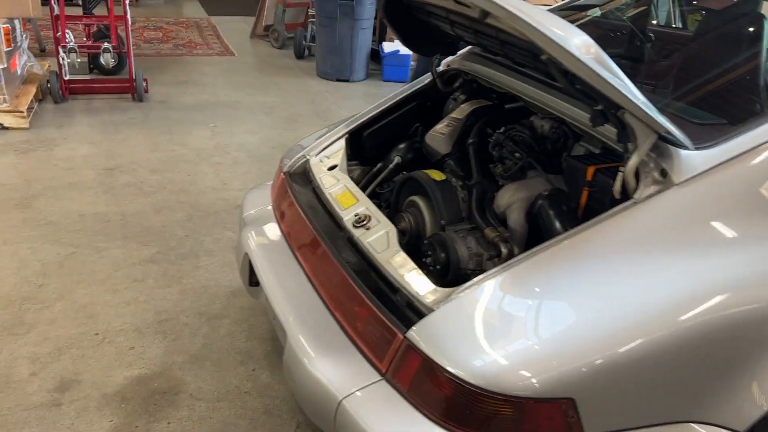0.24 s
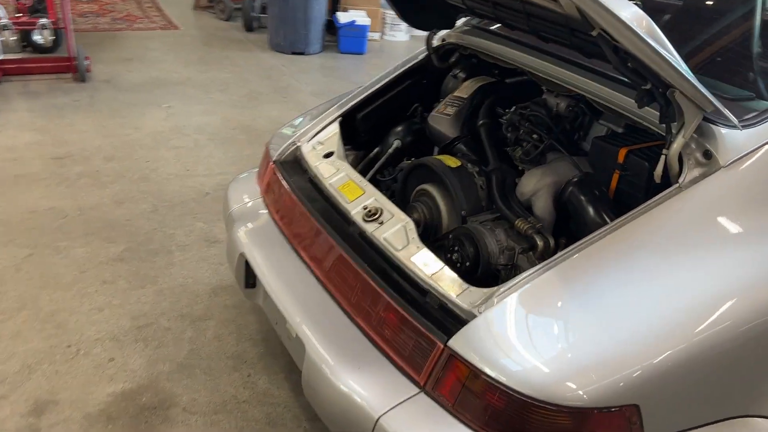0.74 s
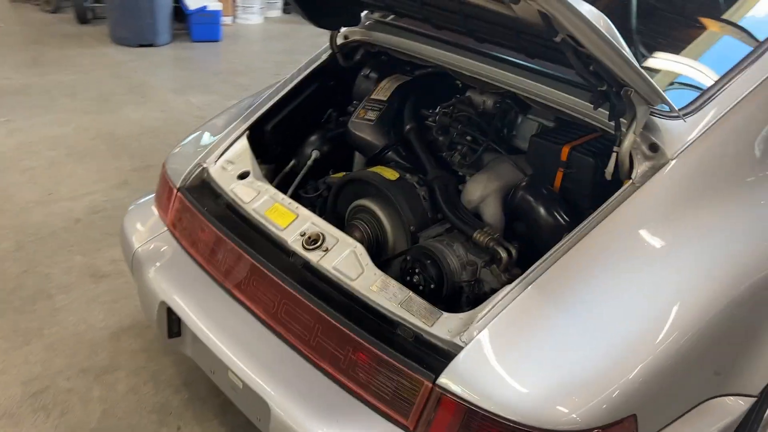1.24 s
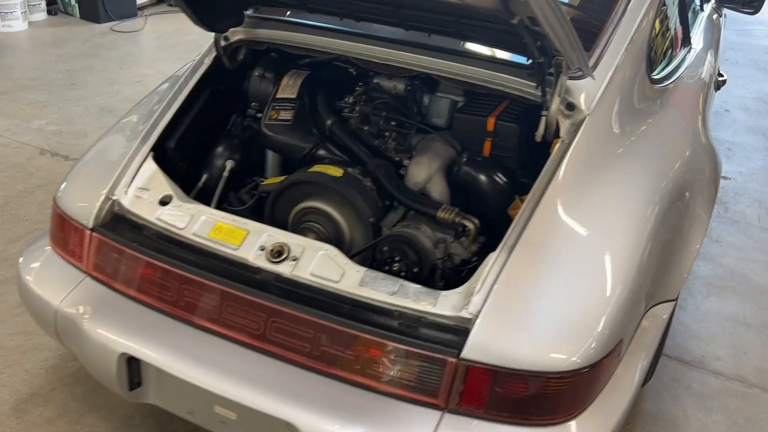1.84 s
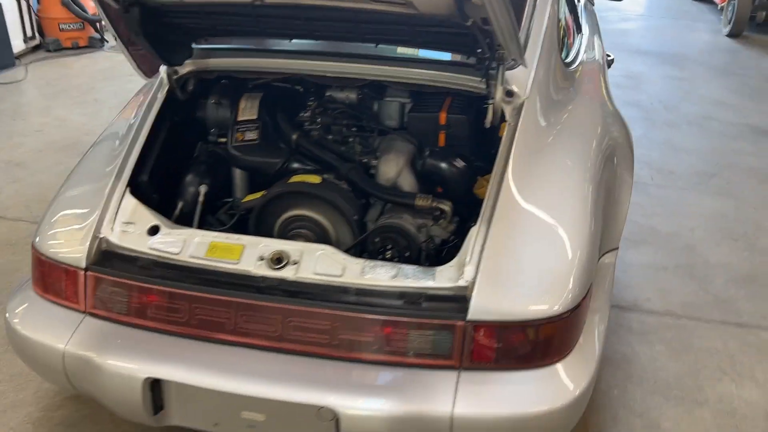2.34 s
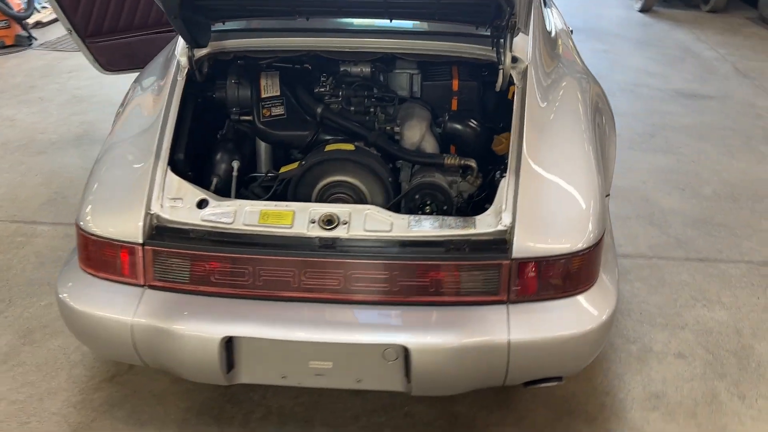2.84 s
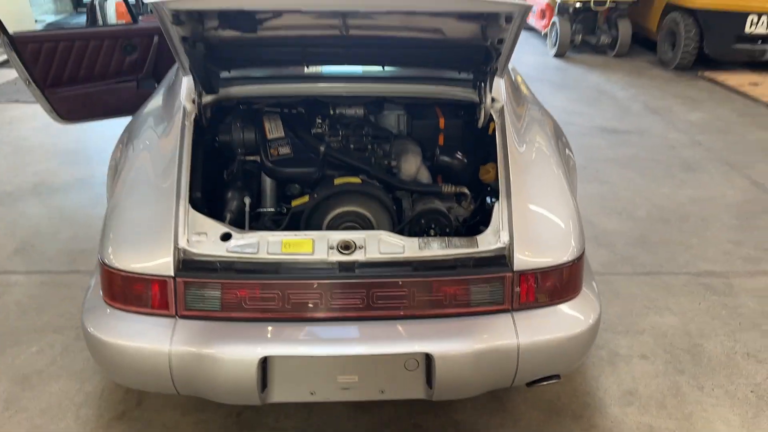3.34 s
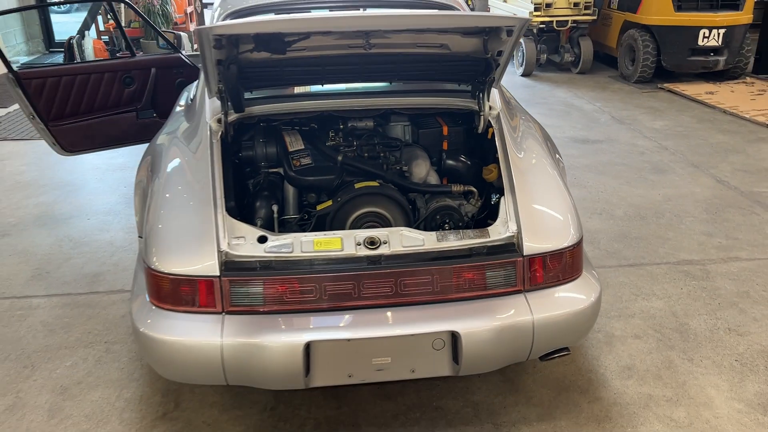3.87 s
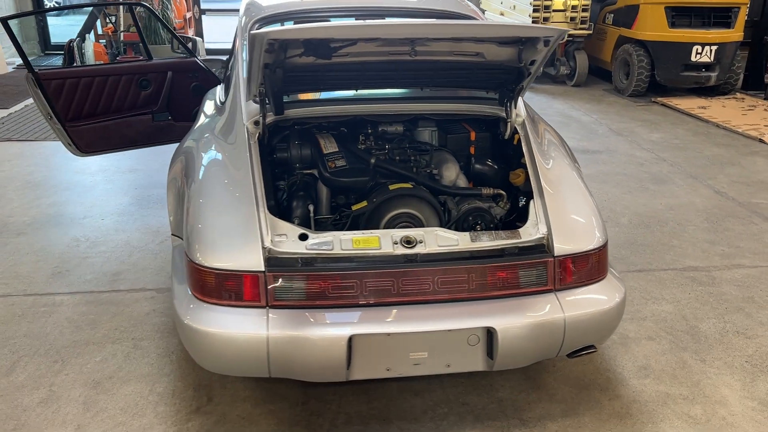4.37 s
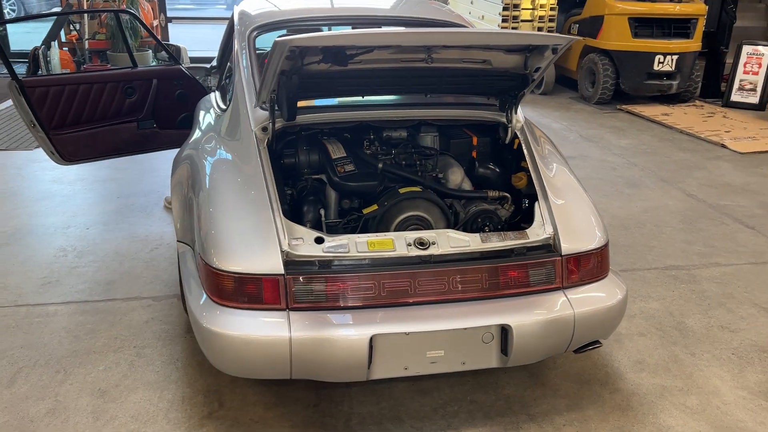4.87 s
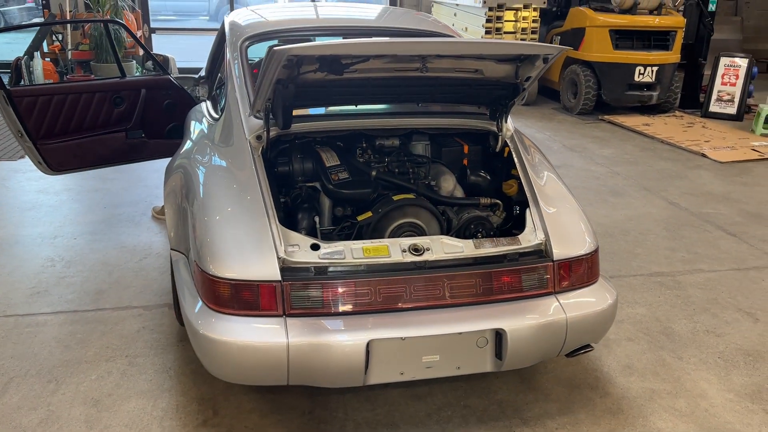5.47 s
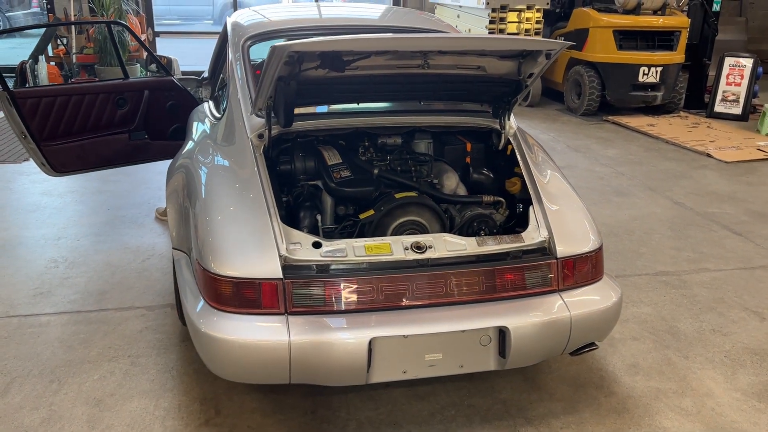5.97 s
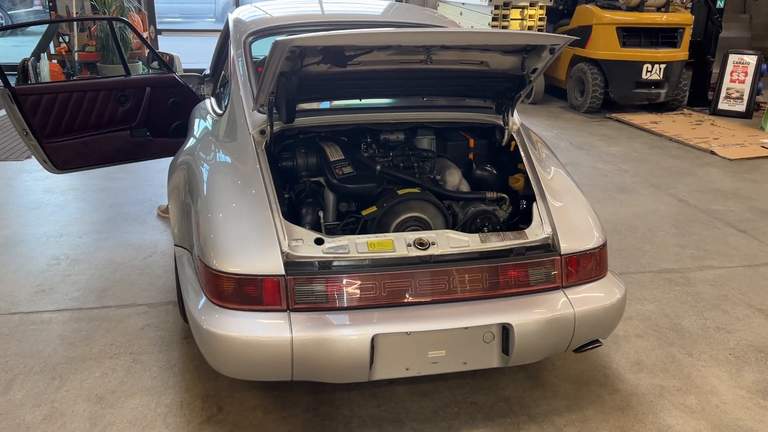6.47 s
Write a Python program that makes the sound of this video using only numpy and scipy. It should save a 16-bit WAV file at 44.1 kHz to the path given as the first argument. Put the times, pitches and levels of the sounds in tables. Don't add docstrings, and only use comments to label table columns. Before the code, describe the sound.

A six-cylinder air-cooled car engine is already idling in a large workshop. Low, slightly uneven exhaust throbs sit under a rushing cooling fan, soft valve ticking and an intake whistle dipping and rising several times a second. Thin belt squeals flare, strongest midway. A handheld stereo microphone moves around the open tail at a few metres, and the idle stumbles more towards the end.

```python
import sys
import numpy as np
from scipy import signal
from scipy.fft import rfft, irfft
from scipy.io import wavfile
from scipy.ndimage import uniform_filter1d

SR = 44100
rng = np.random.default_rng(int(sys.argv[2]) if len(sys.argv) > 2 else 0)


def gain_from_db(level_db):
    decades = np.asarray(level_db, float) / 20
    return 10 ** decades


def unload_wav(signal):
    wavfile.write(
        sys.argv[1],
        SR,
        np.round(np.clip(np.atleast_2d(signal).T, -1, 1) * 32767).astype(np.int16),
    )


N = 295894

# time_s, cycle_rate_hz
IDLE_SPEED = [(0, 8.078), (0.5, 7.81), (1.35, 7.934), (1.7, 7.741), (2.4, 7.682), (2.9, 7.836),
              (3.4, 7.709), (3.7, 7.902), (4.5, 7.76), (5.3, 7.847), (6.71, 7.71)]
# time_s, dip_db
STUMBLES = [(0.07, -1.8), (0.444, -2.2), (0.701, -3.6), (0.927, -2.1), (1.599, -2.6), (1.853, -4.5),
            (2.109, -1.9), (2.349, -2.4), (2.497, -5.5), (2.753, -5.3), (3.272, -11.9), (3.426, -1.6),
            (3.778, -2.5), (4.036, -3.5), (4.299, -9.0), (4.551, -6.3), (4.757, -5.2), (4.932, -9.3),
            (5.32, -16.5), (5.562, -10.2), (5.83, -11.4), (6.088, -18.3), (6.329, -2.2), (6.474, -2.5),
            (6.594, -1.9)]
# strength_db, lateness_ms, valve_tick_db, short_pipe_rasp_db
CYLINDERS = [(0, .1, -3, -13), (.5, .5, -2, -9), (-2, 1.2, -4, 0), (-1, .9, -5, -3), (1, -.6, 3, -13),
             (0, .1, -3, -13)]
# pitch_hz, width_hz, far_bank_share, rasp_share
PIPE_MODES = [(47, 14, .9, 0), (70, 12, -.4, 0), (98, 10, -.1, .25), (117, 7, -.5, 0)]
# pitch_hz, width_hz, far_bank_share, rasp_share
SILENCER_MODES = [(140, 6, .8, 0), (166, 15, .9, 1), (194, 18, .5, .3), (238, 15, .5, .2),
                  (260, 14, -.3, .3), (297, 25, .3, .2)]
PIPE_TRIM_DB = [0.6, -0.6, -0.5, -5]
SILENCER_DB = [-33.5, -31, -39, -33, -44.5, -50.5]
# time_s, distance_m, bearing_from_tail_deg
WALK = [(0, 2.6, 62), (.7, 2.15, 46), (1.3, 2.55, 36), (2.3, 3.15, 15.5), (3, 3.24, 14.5), (3.8, 3.14, 4),
        (4.3, 3.4, -20), (4.7, 4.3, -19), (5.4, 3.36, -26), (6.71, 4.2, -28)]
# level_at_2m_db, distance_loss_share, lobe_db, aim_deg, half_width_deg
PIPE_BEAMS = [(-12, 1, 1, 20, 15), (-17.5, 0.53, 2.5, 21, 12.5), (-23.5, .05, 5.5, 19.6, 8.1),
              (-25.5, -0.4, 4.5, 22.6, 9.2)]
FAN_BEAMS = [
    (-39.8, -0.081, .5, 15, 16),
    (-43, 0.011, 2.6, 32, 11),
    (-42.5, 0.082, 3, 38, 22),
    (-43, -0.22, 5.6, 21, 13),
    (-48, -0.073, 1.9, 30, 16),
]
AIR_BOX_BEAM = (-38.5, 0.58, 6.5, 9, 35)
# pitch_hz, density_db_per_hz
FAN_SPECTRUM = [(40, -46.5), (120, -46), (300, -63), (550, -68.5), (1000, -67), (1700, -67.5),
                (2400, -72.5), (3200, -74.5), (6000, -77.5), (7800, -77), (10200, -86.5), (12600, -77.5),
                (14000, -83), (15700, -80)]
# time_s, lowest_pitch_hz, level_db
SWOOPS = [(.08, 1225, -37), (.24, 1230, -37), (0.399, 1200, -37), (.55, 1227, -35), (0.781, 1215, -35),
          (.95, 1222, -32), (1.15, 1234, -35), (1.33, 1210, -34), (1.571, 1170, -42), (1.829, 1182, -44),
          (2.07, 1208, -39), (2.33, 1186, -35), (2.85, 1242, -37), (3.1, 1265, -34), (3.62, 1248, -33.5),
          (3.931, 1185, -37), (4.27, 1173, -35), (4.52, 1180, -34), (4.76, 1160, -34.5),
          (4.97, 1195, -34.5), (5.3, 1168, -33.5), (5.551, 1170, -37), (5.799, 1158, -34.5),
          (6.069, 1175, -35), (6.3, 1178, -36), (6.492, 1184, -34.5), (6.64, 1186, -35)]
# pitch_hz, width_hz
SQUEAL_TONES = [(2152, 28), (2687, 21), (3360, 47), (4042, 50), (1794, 30), (4410, 59), (5780, 31)]
SQUEAL_REST_DB = [-49.5, -44, -49, -46, -62, -53, -60]
# centre_s, half_length_s, level_db
SQUEAL_FLARES = [
    [(.57, 0.07, -45), (.75, 0.027, -38), (2.58, .06, -41), (2.88, 0.11, -34.5), (3.15, 0.11, -40),
     (3.5, 0.2, -38), (4.15, .08, -36), (4.62, 0.045, -35), (5.12, .08, -40), (5.95, .06, -33),
     (6.2, 0.047, -34), (6.58, .1, -37)],
    [(1.65, .1, -43), (2.02, 0.11, -38), (2.42, 0.052, -44), (3.38, .04, -40), (3.65, 0.056, -32),
     (3.82, .04, -26.5), (4.13, 0.076, -29), (4.43, 0.035, -33), (4.62, .06, -37), (4.95, 0.095, -50),
     (5.95, 0.038, -48), (6.5, 0.14, -45)],
    [(.8, 0.22, -44), (1.15, 0.13, -42), (2.45, 0.092, -43), (3.88, 0.089, -44)],
    [(1.25, 0.23, -40.5), (2.1, .35, -44), (2.8, 0.17, -44), (4.5, .1, -51), (5.1, .2, -55)],
    [(.8, .1, -45), (1.9, 0.22, -37)],
    [(1.599, 0.35, -43)],
    [(.8, 0.29, -40), (5.7, 0.14, -48)],
]
# time_s, lag_ms
FLOOR_LAG = [(0, 2.5), (1, 3.14), (2, 3.4), (3, 3.36), (4, 2.88), (5, 2.72), (6.71, 2.6)]
# pitch_hz, likeness_0_to_1, left_minus_right_db
PORT_LIKENESS = [(50, .9995, .2), (90, .998, -.1), (170, .99, -.7), (350, .9, -1.1), (700, .68, -.1),
                 (1640, .7, -.1), (2700, .72, -.5), (4200, .55, 3.1), (5600, .45, 4.1), (7000, .55, 2.5),
                 (8400, .75, 2.1), (10200, .93, .1), (13400, .97, .1), (15700, .85, .1)]
# pitch_hz, left_lead_rad
PORT_LEAD = [(50, -.09), (250, -.05), (700, .2), (1640, .1), (2700, 1.1), (4200, .7), (5600, -.3),
             (7000, .3), (8400, -1.4), (10200, -3.14), (11800, -4.7), (13400, -6.28), (15700, -8.5)]


def in_time(rows):
    s, *columns = np.transpose(rows)
    return [np.interp(np.arange(N) / SR, s, c) for c in columns]


def at_hz(rows, hz):
    at, *columns = np.transpose(rows)
    return [np.interp(np.log(hz + 1), np.log(at), c) for c in columns]


def rms_one(x):
    return x / np.sqrt(np.mean(x ** 2) + 1e-20)


def drift(rate_hz):
    step, settle = 20, 3000
    r = np.exp(-2 * np.pi * step * rate_hz / SR)
    white = rng.standard_normal(N // step + settle + 2)
    slow = signal.lfilter([1], [1, -2 * r, r * r], white)[settle:]
    return np.interp(np.arange(N) / step, np.arange(len(slow)), rms_one(slow))


def resonate(x, hz, width_hz):
    r = np.exp(-np.pi * width_hz / SR)
    poles = [1, -2 * r * np.cos(2 * np.pi * hz / SR), r * r]
    return rms_one(signal.lfilter([1, 0, -1], poles, x + 1e-18))


def wavering(hz, width_hz, steady):
    carrier = np.exp(2j * np.pi * np.cumsum(hz * np.ones(N)) / SR)
    twins = []
    for side in (0, 1):
        phasor = steady * 1j ** side + drift(width_hz) + 1j * drift(width_hz)
        twins.append(rms_one((carrier * phasor).real))
    return np.array(twins)


def beam(walk, near_db, share, lobe_db, aim_deg, half_width_deg):
    metres, bearing_deg = walk
    lobe = np.exp(-((bearing_deg - aim_deg) / half_width_deg) ** 2)
    return near_db - share * 20 * np.log10(metres / 2) + lobe_db * lobe


def firings(cycles_per_s):
    start_cycles, jitter_s = 0.2, 0.0004
    done = np.cumsum(cycles_per_s) / SR - start_cycles
    count = np.arange(-1, int(6 * done[-1]))
    cylinder = count % 6
    late_s = np.array(CYLINDERS)[cylinder, 1] / 1000 + jitter_s * rng.standard_normal(len(count))
    at = np.interp(count / 6, done, np.arange(N)) + late_s * SR
    return np.clip(at.astype(int), 0, N - 1), cylinder


def exhaust(at, cylinder, pipe_db):
    lead_s, span_s, loss = 0.034, 0.012, 1.95
    uneven_db, skirt = 0.8, 3
    s, dip_db = np.transpose(STUMBLES)
    near = np.exp(-.5 * ((at[:, None] / SR + lead_s - s) / span_s) ** 2)
    missing = loss * near @ (1 - gain_from_db(dip_db))
    strength_db, rasp_db = np.array(CYLINDERS)[cylinder][:, [0, 3]].T
    levels_db = [db + trim_db for db, trim_db in zip(pipe_db, PIPE_TRIM_DB)] + list(SILENCER_DB)
    modes = list(PIPE_MODES) + list(SILENCER_MODES)
    run_in = at[12] - at[0]
    chance = rng.standard_normal((len(at), len(modes)))
    out = np.zeros(N)
    for k, ((hz, width_hz, share, rasp), level_db) in enumerate(zip(modes, levels_db)):
        push = (1 - missing * PIPE_MODES[0][0] / hz) * gain_from_db(strength_db + rasp * rasp_db)
        bank = np.where(cylinder % 2, share, 1)
        scatter = gain_from_db(uneven_db * np.sqrt(hz / 100) * chance[:, k])
        pulses = np.zeros(N)
        pulses[at] = push * bank * scatter
        pulses = np.concatenate([pulses[:run_in], pulses])
        ringing = resonate(resonate(pulses, hz, skirt * width_hz), hz, width_hz)
        out += gain_from_db(level_db) * ringing[run_in:]
    return out


def hall(x):
    t60_s, gap_s, low_cut_hz = 0.9, 0.012, 110
    t = np.arange(int(t60_s * SR)) / SR
    tail = rng.standard_normal(len(t)) * gain_from_db(-60 * t / t60_s) * (t > gap_s)
    tail = signal.sosfilt(signal.butter(2, low_cut_hz, "high", fs=SR, output="sos"), tail)
    return signal.fftconvolve(x, tail / np.sqrt(np.sum(tail ** 2)))[:N]


def valve_gate(at, cylinder, decay_s, spread_db):
    ticks = np.zeros(N)
    ticks[at] = gain_from_db(np.array(CYLINDERS)[cylinder, 2] + spread_db * rng.standard_normal(len(at)))
    r = np.exp(-1 / (decay_s * SR))
    gate = signal.lfilter([1], [1, -2 * r, r * r], ticks)
    return gate / gate.mean()


def fan(change_db, ticks, patchy_db=0.5, sway_db=0.55, tick_share=0.087):
    edges = 30 * 2 ** np.arange(0, 9.2, .5)
    white = rng.standard_normal((2, 2, N))
    together = drift(6.0)
    out = 0
    for k, (low, high) in enumerate(zip(edges, edges[1:])):
        band = signal.sosfilt(signal.butter(2, [low, high], "band", fs=SR, output="sos"), white[k % 2])
        place = np.interp(np.log(low * high) / 2, np.log([700, 3000, 6000, 8000, 12000]), range(5))
        walk_db = 0
        for j, db in enumerate(change_db):
            walk_db = walk_db + max(0, 1 - abs(place - j)) * (db - db.mean())
        treble = place / 4
        flicker_db = patchy_db * (treble * together + 0.65 * drift(4.4))
        gain = gain_from_db(walk_db + flicker_db + sway_db * drift(0.9))
        out = out + band * gain * (1 + tick_share * treble * (ticks - 1))
    colour_db, = at_hz(FAN_SPECTRUM, np.fft.rfftfreq(N, 1 / SR))
    return irfft(rfft(out) * gain_from_db(colour_db) * np.sqrt(SR / 2), N)


def intake(hump_db):
    rise_hz_per_s2, rise_max_hz = 8000, 120
    fade_db_per_s2, fade_max_db = 500, 8
    s, low_hz, peak_db = np.transpose(SWOOPS)
    t = np.arange(N) / SR
    nearest = np.searchsorted((s[1:] + s[:-1]) / 2, t)
    off = (t - s[nearest]) ** 2
    hz = low_hz[nearest] + np.minimum(rise_hz_per_s2 * off, rise_max_hz)
    hz = uniform_filter1d(hz, size=1500)
    level_db = peak_db[nearest] - np.minimum(fade_db_per_s2 * off, fade_max_db)
    level_db = uniform_filter1d(level_db, size=900)
    white = rng.standard_normal((2, N))
    breath = np.array([resonate(resonate(w, 1318, 290), 1318, 290) for w in white])
    whistle = wavering(hz, width_hz=8.7, steady=3.0)
    return gain_from_db(level_db - 2.0) * whistle + gain_from_db(hump_db - 1.0) * breath


def squeals(throb):
    t = np.arange(0, N, 64) / SR
    out = 0
    for (hz, width_hz), rest_db, flares in zip(SQUEAL_TONES, SQUEAL_REST_DB, SQUEAL_FLARES):
        gain = gain_from_db(rest_db)
        for s, half_s, db in flares:
            gain = gain + gain_from_db(db) * np.exp(-((t - s) / half_s) ** 2)
        out = out + np.interp(np.arange(N) / SR, t, gain) * wavering(hz, width_hz, steady=0.45)
    return out * throb


def tinware(level_db, width_hz, sway_db):
    white = rng.standard_normal((2, N))
    out = 0
    for hz in np.geomspace(4350, 7700, 12) * rng.uniform(0.95, 1.02, 12):
        out = out + gain_from_db(level_db + sway_db * drift(0.82)) * resonate(white, hz, width_hz)
    return out


def floor_bounce(x, bounce_db):
    lag_ms, = in_time(FLOOR_LAG)
    read = np.arange(N) - (lag_ms + 0.074 * drift(1.47)) * SR / 1000
    late = np.array([np.interp(read, np.arange(N), row) for row in x])
    return (x + gain_from_db(bounce_db) * late) / np.sqrt(1 + gain_from_db(2 * bounce_db))


def scene():
    cycles_per_s, = in_time(IDLE_SPEED)
    walk = in_time(WALK)
    pipe_db = [beam(walk, *row) for row in PIPE_BEAMS]
    fan_db = [beam(walk, *row) for row in FAN_BEAMS]
    hump_db = beam(walk, *AIR_BOX_BEAM)
    at, cylinder = firings(cycles_per_s)
    pipes = exhaust(at, cylinder, pipe_db)
    ticks = valve_gate(at, cylinder, decay_s=0.0027, spread_db=5.5)
    throb = 0.29 + 0.19 * valve_gate(at[::2], cylinder[::2], decay_s=0.013, spread_db=1.0)
    engine_bay = fan(fan_db, ticks) + intake(hump_db) + squeals(throb)
    engine_bay = engine_bay + tinware(level_db=-59, width_hz=72, sway_db=4.0)
    return np.array([pipes, hall(pipes)]) + floor_bounce(engine_bay, bounce_db=-19.0)


def roll_off(x):
    return signal.sosfilt(signal.butter(12, 15700, fs=SR, output="sos"), x)


def record(dry):
    hz = np.fft.rfftfreq(N, 1 / SR)
    lead_rad, = at_hz(PORT_LEAD, hz)
    alike, balance_db = at_hz(PORT_LIKENESS, hz)
    alike = np.clip(alike, 0, 1)
    shared, apart = rfft(dry) * np.sqrt([(1 + alike) / 2, (1 - alike) / 2])
    port = np.exp(.5j * lead_rad) * gain_from_db(balance_db / 2)
    both = irfft([(shared + apart) * port, (shared - apart) / port], N)
    rumble_cut_hz = 36
    both = signal.sosfilt(signal.butter(4, rumble_cut_hz, "high", fs=SR, output="sos"), both)
    return roll_off(both)


dry = scene()
out = record(dry)
unload_wav(out)
```